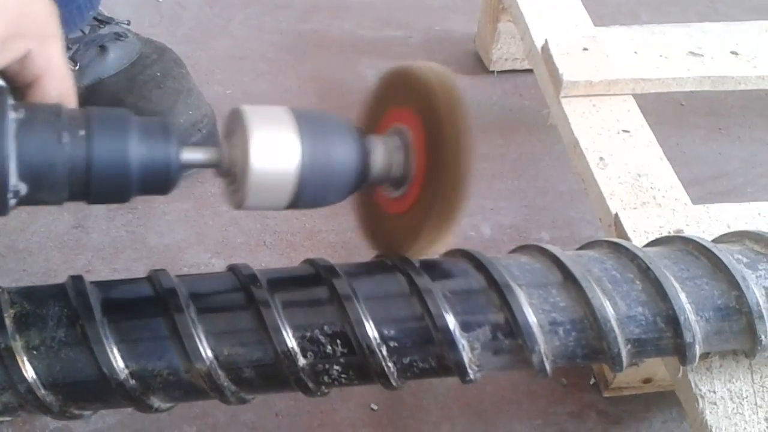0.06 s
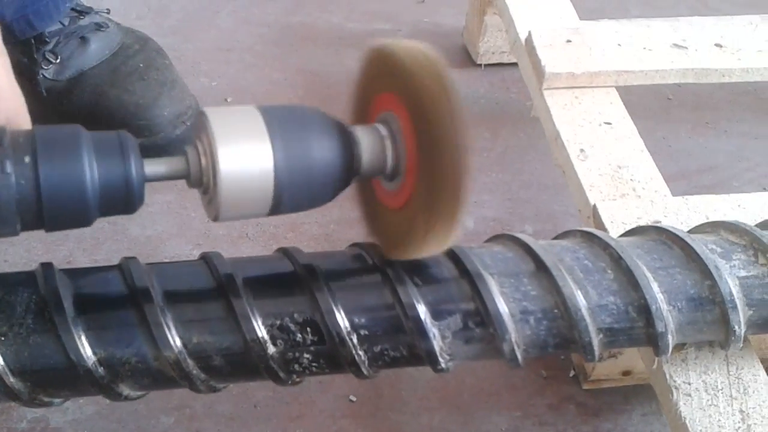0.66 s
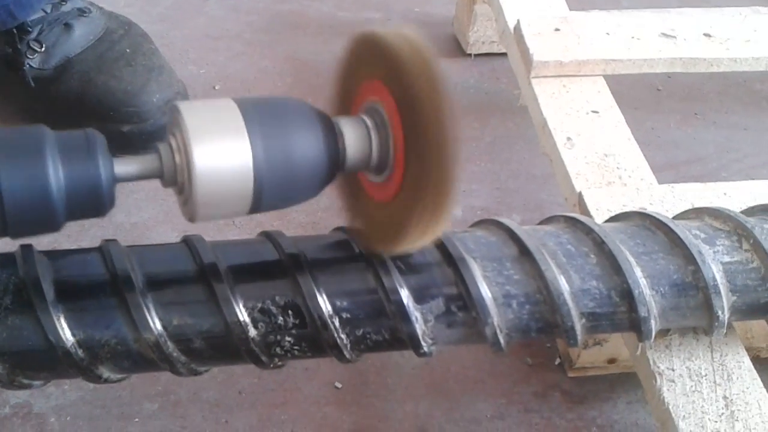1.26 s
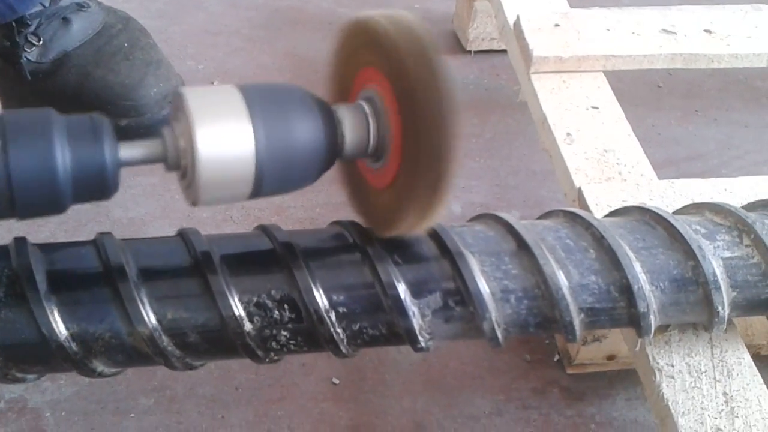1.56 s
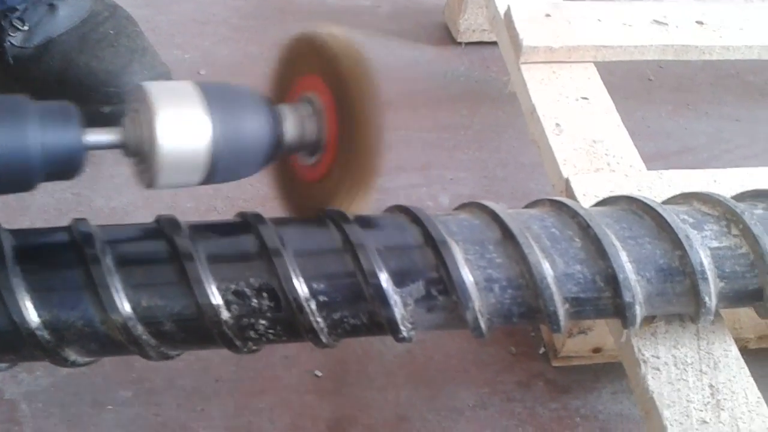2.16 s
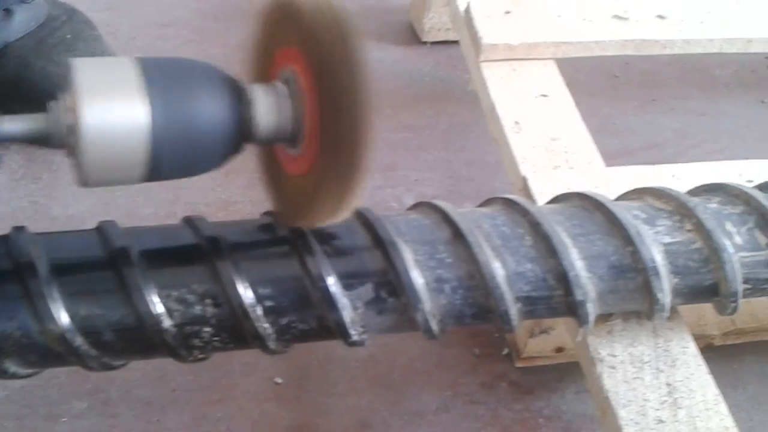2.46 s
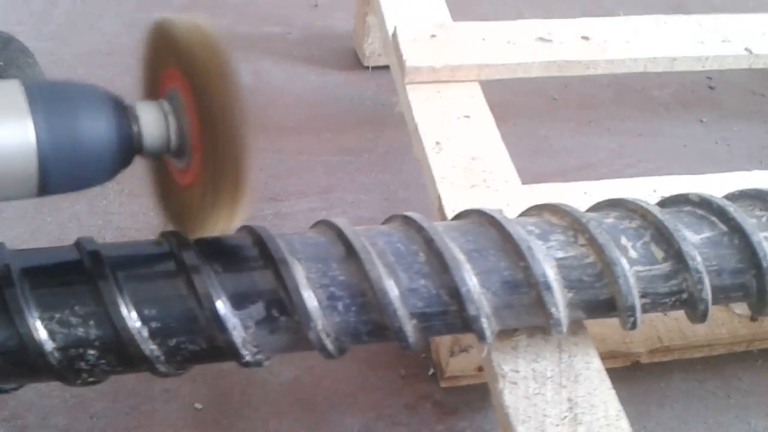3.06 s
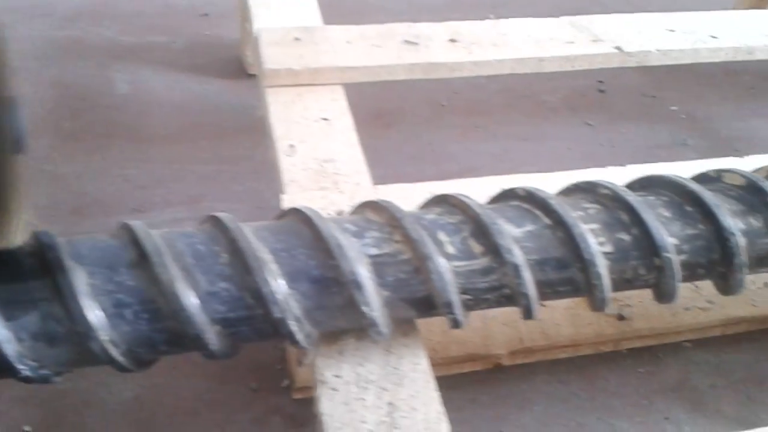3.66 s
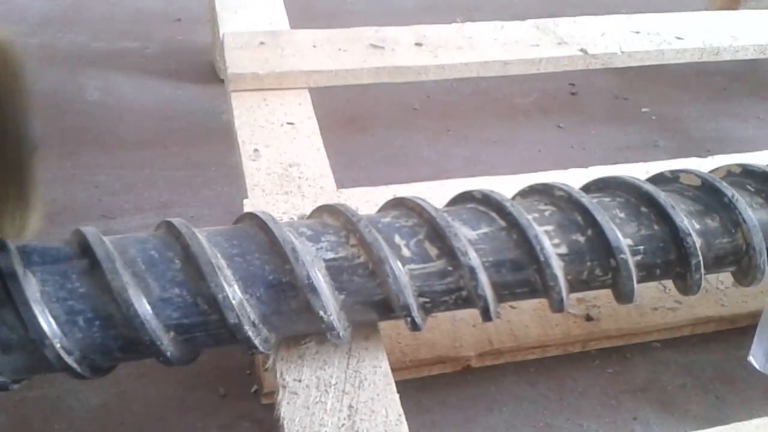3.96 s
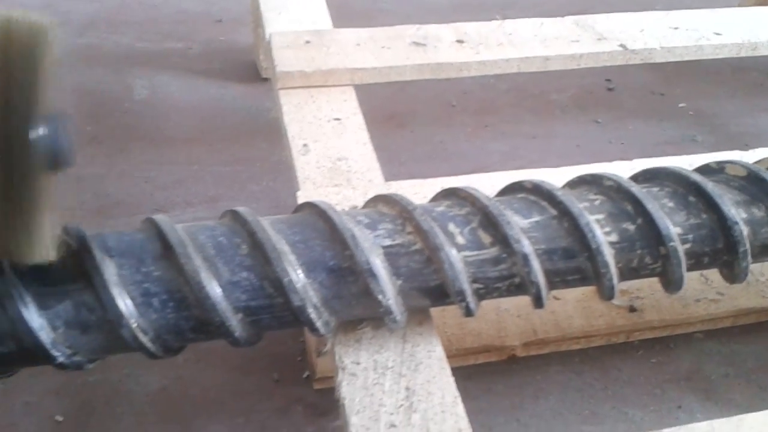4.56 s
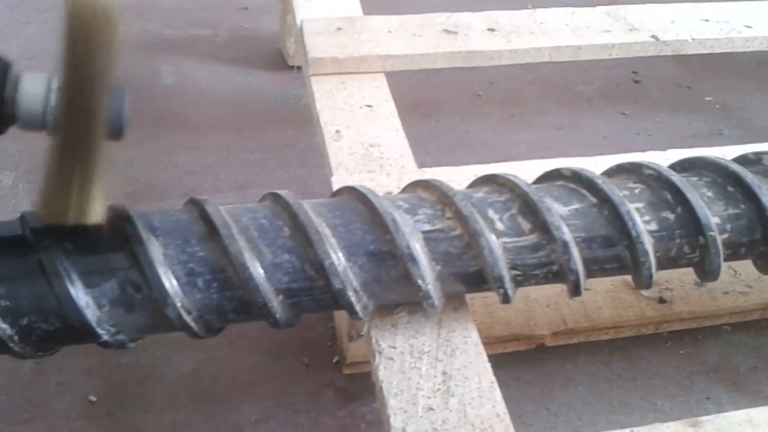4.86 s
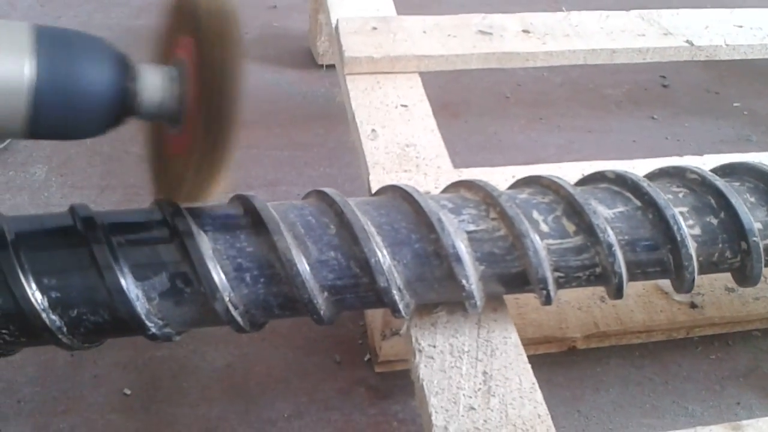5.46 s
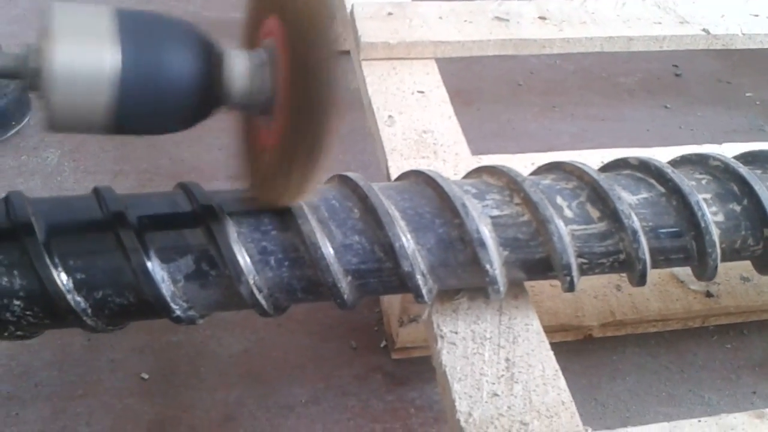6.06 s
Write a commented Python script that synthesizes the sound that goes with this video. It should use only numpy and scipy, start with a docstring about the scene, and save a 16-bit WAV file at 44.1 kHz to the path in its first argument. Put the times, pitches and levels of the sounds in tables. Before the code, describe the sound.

A hand drill with a wire wheel is already running against a large steel screw, close to a mono microphone in a workshop. A high, slightly fluttering gear whine and a bright hiss of scrubbing bristles continue for the whole six seconds or so, with pitch and level nearly steady. Whenever the wheel bites into the thread, the hiss swells a little and the whine briefly dips, most clearly around 0.8, 1.3, 1.9 and 2.5 seconds. From about 3.3 to 4.7 seconds the drill moves aside and the hiss changes colour subtly. A thin motor whistle starts sputtering after 4.2 seconds. More bites come near 4.6, 5.1 and 5.7 seconds. Underneath, distant machines make a faint, dull roar and hum, with one faint tone wavering between 4 and 4.8 seconds. The drill is still running at the end.

```python
"""A hand drill turns a wire wheel against a large steel screw in a workshop, close to a mono camera mic.
Its two gear stages and its commutator whine and the bristles hiss; whenever the wheel bites into the
thread, the hiss swells and the main whine usually dips. Midway the drill moves off to the side, and a
close reflection shifts the colour of the hiss. Other machines hum farther off in the hall;
the camera's gain control gently evens out the level."""
import sys
import numpy as np
from scipy import signal
from scipy.fft import rfft, irfft, next_fast_len
from scipy.io import wavfile
from scipy.ndimage import uniform_filter1d, map_coordinates

SR = 44100
rng = np.random.default_rng(int(sys.argv[2]) if len(sys.argv) > 2 else 0)


def dump_mix(stems):
    """Bounce the given channels to the path in sys.argv[1] as a 16-bit WAV at rate SR."""
    frames = np.atleast_2d(stems).T  # one column per channel
    limited = np.clip(frames, -1, 1)  # hard clip at full scale
    pcm = np.round(limited * 32767).astype(np.int16)
    wavfile.write(sys.argv[1], SR, pcm)


N = 277735
TIME_S = np.arange(N) / SR
PINION_TEETH, LAYSHAFT_TEETH, SECOND_TEETH, COMMUTATOR_BARS = 6, 26, 10, 29


def amp(db):
    """Decibels to gain."""
    return 10 ** (np.asarray(db) / 20)


def unit(x):
    """Scale to rms 1."""
    return x / np.sqrt(np.mean(x ** 2) + 1e-20)


def curves(rows):
    """One value per sample for each column after the time."""
    times, *columns = np.transpose(rows)
    return [np.interp(TIME_S, times, column) for column in columns]


def wobble(rate):
    """A smooth random curve, rate knots a second."""
    knots = rng.standard_normal(int(N * rate / SR) + 4)
    return map_coordinates(knots, [TIME_S * rate])


def filtered(x, response):
    """Filter x by a gain given as a function of frequency."""
    size = next_fast_len(N + 8192)
    return irfft(rfft(x, size) * response(np.fft.rfftfreq(size, 1 / SR)), size)[:N]


def rush(colour, patchy_db):
    """Coloured noise of rms 1 with drifting patches of gain."""
    white = signal.stft(rng.standard_normal(N), nperseg=512)[2]
    patches = uniform_filter1d(rng.standard_normal(white.shape), size=6, axis=0)
    patches = unit(uniform_filter1d(patches, size=30, axis=1))
    noise = signal.istft(white * amp(patchy_db * patches), nperseg=512)[1][:N]
    freq_hz, db = np.transpose(colour)
    return unit(filtered(noise, lambda hz: amp(np.interp(np.log(hz + 1), np.log(freq_hz), db))))


def tone(cycles):
    """A sine of rms 1 that follows a running count of cycles."""
    return np.sqrt(2) * np.sin(2 * np.pi * (cycles + rng.random()))


def wire_wheel(layshaft):
    """Countless wires scrape the steel: a hiss that throbs with the gearing and swells in each bite."""
    # scrubbing wires between bites: time_s, level_db
    scrub_levels = [(0, -15.5), (1.3, -16), (2.1, -16.5), (2.6, -17), (2.72, -17.9), (3.28, -15.5),
                    (3.8, -18), (4.35, -16.5), (4.5, -16.5), (4.72, -14.5), (5.57, -17.5), (6.3, -15.5)]
    # colour of the scrub: freq_hz, relative_db
    scrub_colour = [(300, -51), (800, -9.5), (1300, -10.5), (1700, -4.5), (2400, -5), (3200, -4.5),
                    (4000, -3.5), (4700, 1), (5500, 2), (6200, -1), (7200, -8.5), (8500, -17),
                    (11000, -27.5)]
    # colour of the fizzing wire tips: freq_hz, relative_db
    tip_colour = [(4000, -26), (7000, -3.5), (8200, 2), (9000, -4.5), (10000, -8.5), (11200, -14),
                  (12500, -19), (14000, -15), (15700, -34)]
    scrub_db, = curves(scrub_levels)
    _, rise_db, _ = bites()
    settling_db = -5.5 * np.clip(1 - TIME_S / 0.9, 0, 1)  # the tips fizz less at first
    fizz_db = -27.5 + settling_db + 0.55 * rise_db
    throb = tone(layshaft)
    press = wobble(45)  # the springy wheel presses unevenly
    scrub = amp(scrub_db + rise_db + 0.44 * press) * rush(scrub_colour, patchy_db=0.98)
    fizz = amp(fizz_db + 0.85 * press) * rush(tip_colour, patchy_db=2.0)
    return scrub * (1 + 0.052 * throb) + fizz * (1 + 0.017 * throb)


def reflected(hiss, front_ms=0.941, aside_ms=0.503, echo_db=-18):
    """A nearby surface combs the hiss; the comb slides as the drill moves aside."""
    # travel along the screw: time_s, aside_fraction (0 in front of the mic, 1 farthest aside)
    travel = [(0, 0.1), (2.8, 0.17), (3.05, 0.17), (3.3, 0.2), (3.48, .9), (3.95, 0.92), (4.2, 0.46),
              (4.55, 0.5), (4.8, 0.14), (5.5, 0.31), (6.3, 0.076)]
    aside, = curves(travel)
    delay_ms = front_ms + (aside_ms - front_ms) * aside
    echo = map_coordinates(hiss, [np.arange(N) - delay_ms * SR / 1000])
    return hiss + amp(echo_db) * echo


def runout(shaft):
    """Tooth errors of a gear: an uneven pattern of rms 1 that repeats every turn."""
    return unit(sum(tone(k * shaft) / np.sqrt(k) for k in range(1, 6)))


def gear_tone(cycles, shaft, db, uneven, rough, flutter):
    """One mesh harmonic: tooth errors add sidebands, backlash roughens it, the load makes it flutter."""
    swing = uneven * runout(shaft) + rough * wobble(300)
    slip = (uneven * runout(shaft) + rough * wobble(120)) / (2 * np.pi)
    return amp(db) * (1 + swing + flutter * wobble(42)) * tone(cycles + slip)


def gears(turns, layshaft):
    """The pinion's teeth whine against the layshaft gear; a second, slower mesh drives the chuck."""
    # pinion mesh, fundamental: time_s, relative_db
    low_levels = [(0.0, -28.0), (0.11, -34), (0.2, -25.9), (2.05, -20.5), (2.34, -26), (2.57, -21.1),
                  (2.76, -28.5), (2.96, -18.5), (3.09, -29), (3.26, -20.5), (3.47, -32.0), (3.71, -25.3),
                  (3.94, -35), (4.2, -22.5), (4.33, -27.5), (4.69, -22.5), (4.76, -30.0), (4.99, -19.5),
                  (5.25, -24.5), (6.3, -21)]
    # its second harmonic, the main whine, between bites: time_s, level_db
    whine_levels = [(0.0, -15), (1.86, -18), (2.21, -14), (2.48, -15.5), (2.78, -13), (2.96, -17),
                    (3.05, -15.5), (3.66, -16), (4.07, -13.5), (4.24, -20.7), (4.29, -16.5), (5.12, -20.5),
                    (5.51, -12), (6.3, -18.5)]
    # its third harmonic between bites: time_s, relative_db
    high_levels = [(0.0, -30), (0.58, -27), (0.96, -36), (1.07, -20.5), (1.22, -30), (1.5, -26.7),
                   (1.76, -36), (2.39, -21.5), (2.51, -42.4), (2.62, -26), (3.06, -24.5), (3.32, -34),
                   (3.45, -16.7), (4.73, -25), (4.78, -27), (4.97, -36.9), (5.12, -15), (5.21, -39),
                   (5.7, -26.4), (6.3, -33.7)]
    # chuck mesh as a whole: time_s, level_db
    chuck_levels = [(0, -33), (.9, -28), (1.13, -33), (1.35, -29), (2.42, -31.5), (2.6, -27.5), (2.73, -35),
                    (2.95, -31), (4.35, -31), (5.6, -33.5), (6.3, -31)]
    # its harmonics: tooth_rate_multiple, relative_db
    chuck_harmonics = [(2, 0.2), (3, 0), (4, -9), (5, -33), (6, -14)]
    low_db, = curves(low_levels)
    whine_db, = curves(whine_levels)
    high_db, = curves(high_levels)
    chuck_db, = curves(chuck_levels)
    drop_db, _, third_db = bites()
    teeth = PINION_TEETH * turns
    low = gear_tone(teeth, layshaft, low_db - 0.6, uneven=0.044, rough=0.17, flutter=0.25)
    whine = gear_tone(2 * teeth, layshaft, whine_db - drop_db, uneven=0.074, rough=0.034, flutter=0.1)
    high = gear_tone(3 * teeth, layshaft, high_db + third_db - 0.3,
                     uneven=0.039, rough=0.074, flutter=0.16)
    chuck = sum(gear_tone(k * SECOND_TEETH * layshaft, layshaft, chuck_db + db,
                          uneven=0.13, rough=0.25, flutter=0.28) for k, db in chuck_harmonics)
    return low + whine + high + chuck


def motor(turns, sputter_from_s=4.2):
    """Armature and fan sing; the commutator bars whistle under the carbon brushes, sputtering later on."""
    # armature and fan: speed_multiple, level_db
    armature_orders = [(1, -46.5), (2, -47), (3, -47.5), (4, -37), (5, -44), (9, -62), (11, -59), (13, -32),
                       (14, -32), (15, -48), (17, -54), (19, -68), (21, -48.5), (23, -46.5), (24, -44.5),
                       (25, -55), (26, -55), (27, -64)]
    # commutator whistle: time_s, relative_db
    whistle_levels = [(0.0, -39), (0.21, -37), (0.54, -44), (0.9, -39.6), (1.11, -51), (1.21, -34.9),
                      (2.07, -35.5), (2.13, -40.2), (2.98, -40.9), (3.07, -31.6), (3.36, -33.5),
                      (4.28, -31.5), (4.35, -52), (4.4, -31), (4.65, -36), (5.42, -38), (5.47, -42.8),
                      (6.3, -39.1)]
    armature = sum(amp(db + 3.3 * wobble(20)) * tone(k * turns) for k, db in armature_orders)
    whistle_db, = curves(whistle_levels)
    sputtering = np.clip((TIME_S - sputter_from_s) / 0.2, 0, 1)
    sputter_db = np.minimum(5 * wobble(24) * sputtering, 2.5)
    contact = 1 + 0.24 * wobble(45)
    whistle = tone(COMMUTATOR_BARS * turns + 0.039 * wobble(110))
    return armature + amp(whistle_db + sputter_db + 0.7) * contact * whistle


def workshop():
    """Distant machines in the hall: a dull roar, a low drone and slowly swelling hum lines."""
    # the hall at the mic: time_s, roar_relative_db, drone_db
    hall_levels = [(0, -32, -48), (1.3, -36, -46), (1.7, -38.5, -44), (2.8, -38, -43), (3.2, -33.5, -41.5),
                   (4, -34.5, -46), (4.7, -33, -37), (5.4, -34.5, -40), (5.8, -36, -46), (6.3, -34.5, -46)]
    # colour of the roar: freq_hz, relative_db
    roar_colour = [(20, -35), (45, -23), (60, -11), (85, -18), (110, -5), (190, -2.5), (300, 3.5),
                   (360, 0.5), (520, 5), (700, 0.5), (1100, -13.5), (2500, -25)]
    # colour of the drone: freq_hz, relative_db
    drone_colour = [(110, -27), (170, -6.5), (200, -0.5), (240, -12), (290, 0.5), (350, -15), (450, -26)]
    # machine hum: pitch_hz, level_db
    hum_lines = [(99, -58.5), (121, -54), (148, -57.5), (175, -50.5), (221, -51.5), (275, -49.5),
                 (297, -46.5), (440, -46), (495, -52), (550, -50), (605, -59), (660, -45), (825, -49.5)]
    roar_db, drone_db = curves(hall_levels)
    roar = amp(roar_db - 1.5) * rush(roar_colour, patchy_db=1.0)
    drone = amp(drone_db) * rush(drone_colour, patchy_db=1.3)
    hum = sum(amp(db + 0.67 * wobble(2.14)) * tone(hz * TIME_S + 0.05 * wobble(6.6))
              for hz, db in hum_lines)
    return roar + drone + hum


def bites(edge_s=0.049):
    """The wheel catches in the thread: three curves of level change that set in, hold and let go."""
    # each bite: start_s, length_s, whine_drop_db, scrub_rise_db, third_harmonic_change_db
    catches = [(0.142, .08, 3, 0.5, -7), (0.78, 0.19, 6, 0.8, 8.5), (1.245, 0.2, 11, 1.5, 5),
               (1.868, 0.25, 9.5, 0.7, 6.5), (2.084, .06, 0, 2, -3), (2.46, 0.15, 8, 2.1, -1),
               (3.467, 0.23, 3.5, 0.8, -1), (3.924, 0.12, 4, 1, 2.5), (4.2, 0.19, 2.5, 1, 1),
               (4.547, 0.099, 14, 0.5, 0), (5.064, 0.076, 6, 1.5, -10), (5.298, 0.13, 2, 2, 4),
               (5.707, 0.2, 4, 1.5, 2.5)]
    total_db = np.zeros((3, N))
    for start_s, length_s, *changes_db in catches:
        inside_s = np.minimum(TIME_S - start_s, start_s + length_s - TIME_S)
        total_db += np.outer(changes_db, np.clip(0.5 + inside_s / edge_s, 0, 1))
    return total_db


def distant_waver():
    """One faint tone wavers briefly in the background."""
    # its course: time_s, pitch_hz, level_db
    course = [(3.95, 570, -70), (4.08, 610, -44), (4.18, 640, -40), (4.33, 660, -60), (4.48, 658, -44),
              (4.6, 642, -36), (4.68, 632, -43), (4.78, 625, -70)]
    pitch_hz, level_db = curves(course)
    flutter = 1 + 0.4 * wobble(25)
    cycles = np.cumsum(pitch_hz + 9 * wobble(40)) / SR
    return amp(level_db) * flutter * tone(cycles)


def scene():
    """The drill up close, the hall behind; all its parts follow the slightly trembling armature."""
    # armature speed, sagging as the wheel is pressed on: time_s, speed_hz
    speeds = [(0.0, 393.6), (0.07, 392.8), (0.43, 399.6), (0.84, 395.2), (1.24, 398.9), (1.5, 394.9),
              (1.97, 390.8), (2.4, 399.6), (2.66, 394.6), (2.93, 396.6), (3.13, 393.1), (3.73, 396.2),
              (3.9, 395.1), (4.18, 398.0), (4.5, 395.4), (4.73, 398.2), (4.87, 395.5), (5.0, 396.6),
              (5.35, 393.9), (5.7, 395.5), (5.77, 393.7), (6.3, 392.2)]
    speed_hz, = curves(speeds)
    turns = np.cumsum(speed_hz + 0.1975 * wobble(30)) / SR
    layshaft = turns * PINION_TEETH / LAYSHAFT_TEETH
    hiss = reflected(wire_wheel(layshaft))
    mono = hiss + gears(turns, layshaft) + motor(turns) + workshop() + distant_waver()
    return np.array([mono, mono])


def gain_control(x, target_db, strength, window_s):
    """The camera's gain leans against the running level at the mic."""
    power = np.abs(uniform_filter1d(x ** 2, int(window_s * SR))) + 1e-9
    return x * amp(strength * (target_db - 10 * np.log10(power)))


def record(dry):
    """The mono camera steadies the level, rounds off the peaks and keeps nothing above its band limit."""
    ceiling, top_hz = 0.78, 15750
    steadied = gain_control(dry[0], target_db=-12.1, strength=0.15, window_s=0.015)
    rounded = steadied / (1 + np.abs(steadied / ceiling) ** 8) ** (1 / 8)
    mono = filtered(rounded, lambda hz: hz < top_hz)
    return np.array([mono, mono])


dry = scene()
out = record(dry)
dump_mix(out)
```